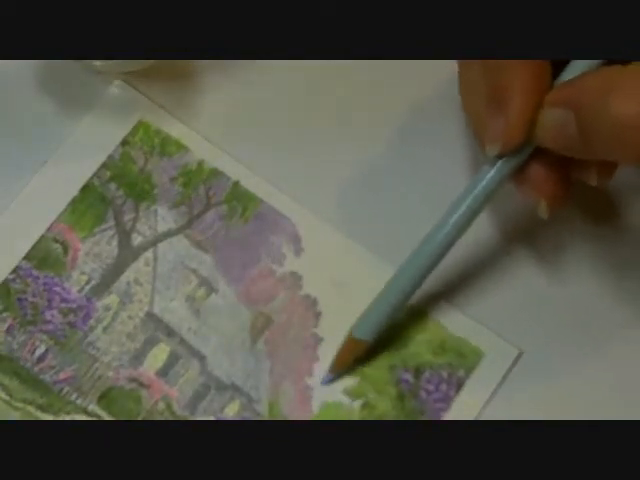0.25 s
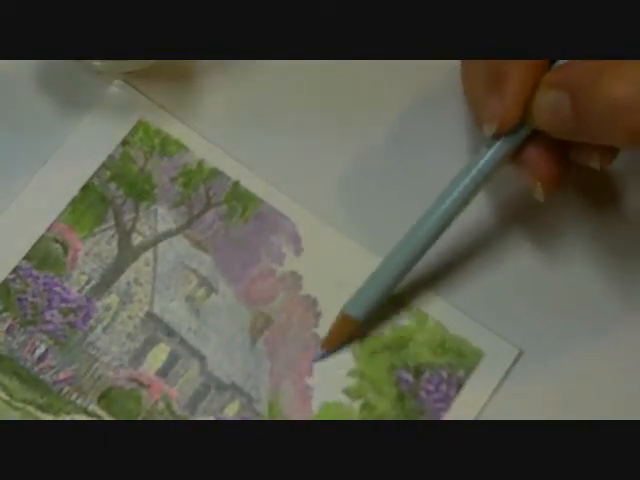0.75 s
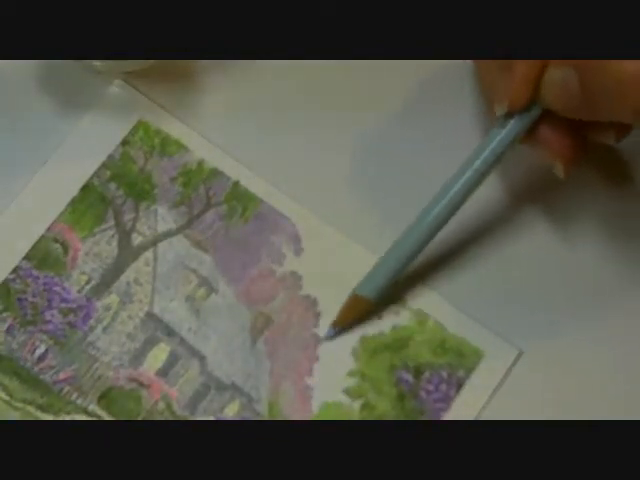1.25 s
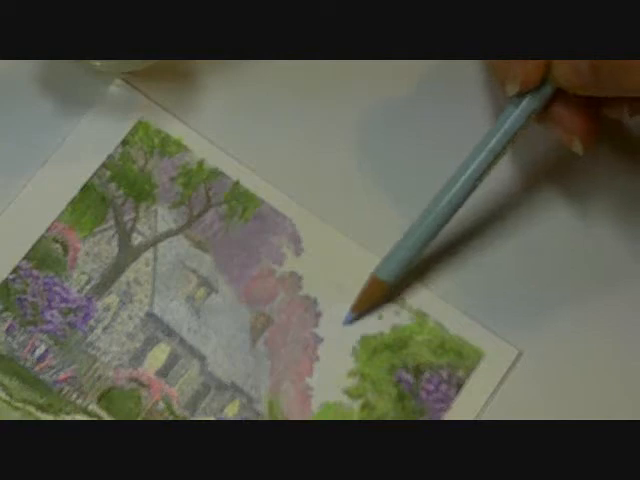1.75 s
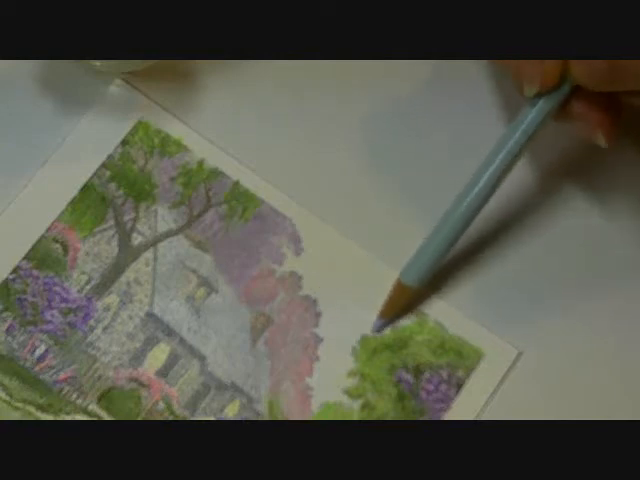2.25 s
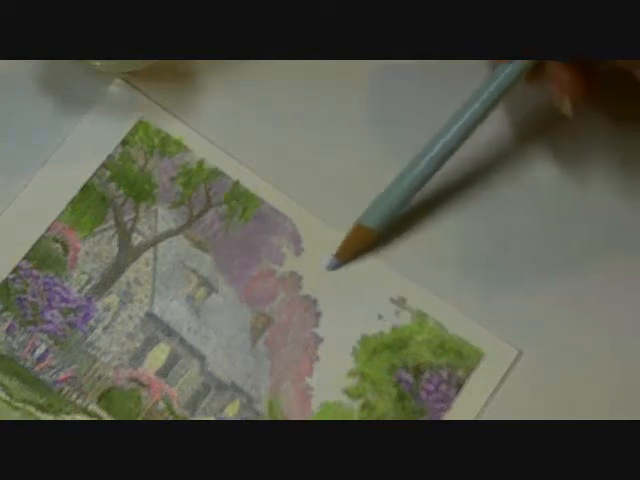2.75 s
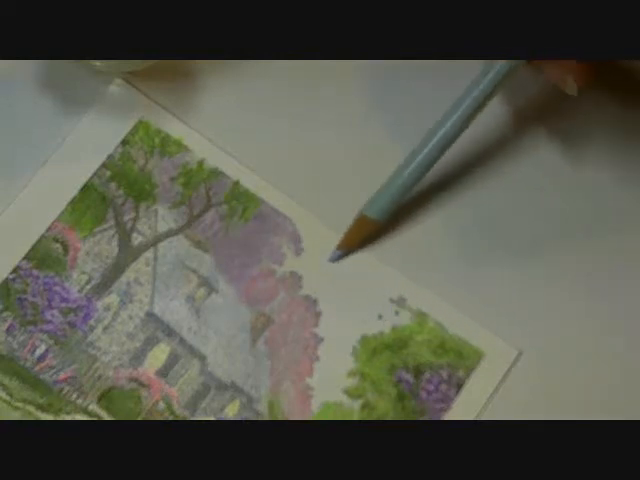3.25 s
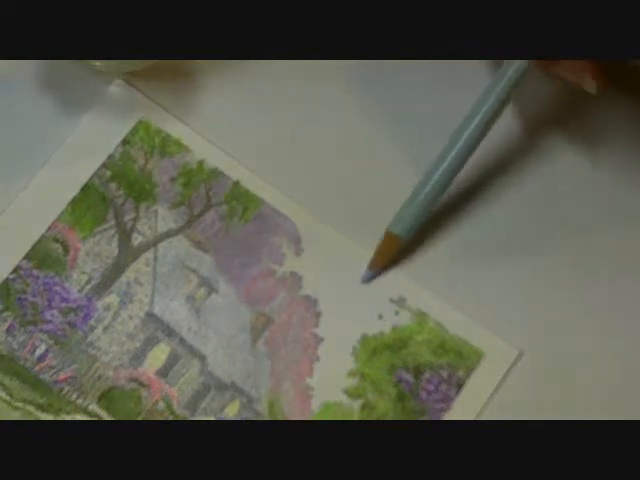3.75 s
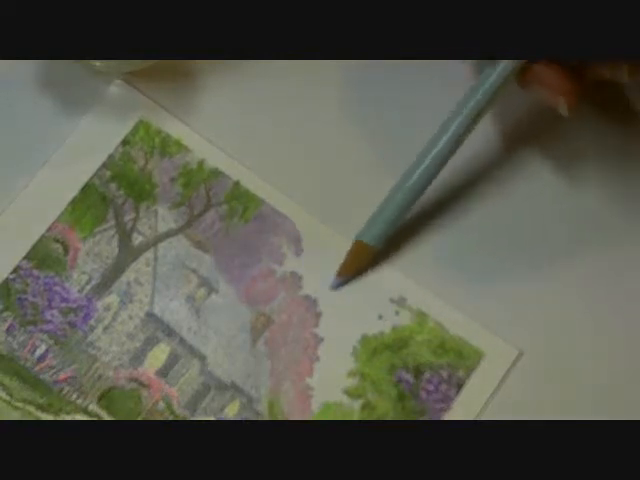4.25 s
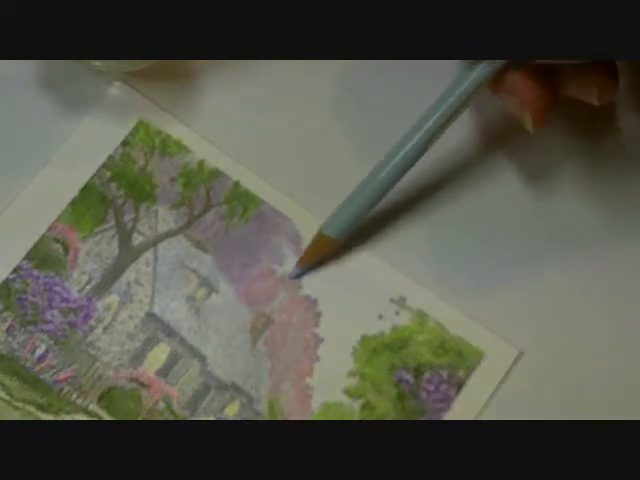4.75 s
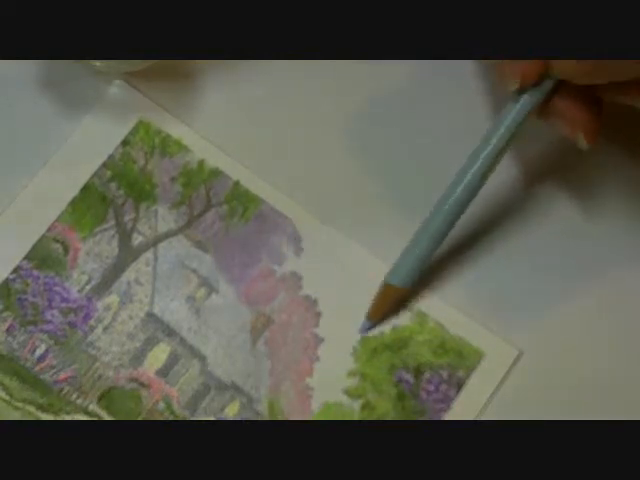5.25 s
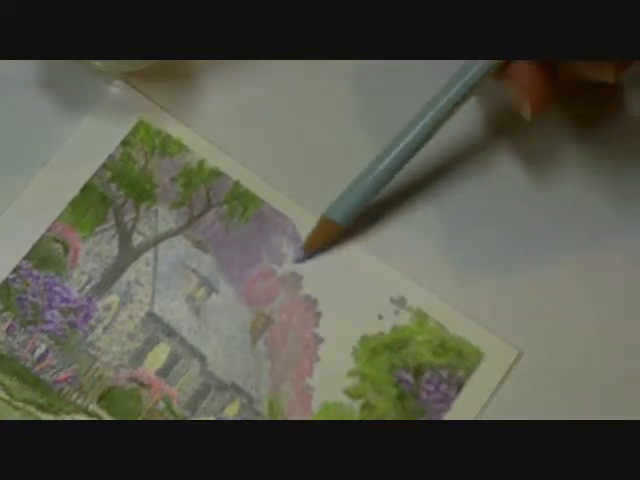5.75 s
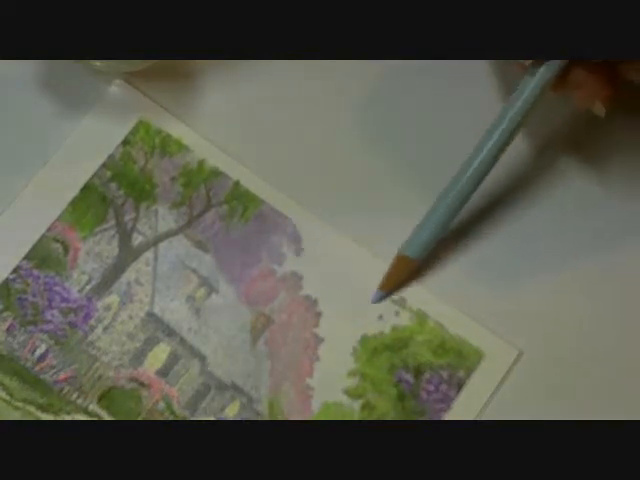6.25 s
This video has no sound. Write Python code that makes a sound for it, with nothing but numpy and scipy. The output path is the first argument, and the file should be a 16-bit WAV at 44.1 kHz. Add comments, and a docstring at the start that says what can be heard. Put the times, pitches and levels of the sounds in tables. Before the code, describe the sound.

Close to the microphone, a coloured pencil shades paper without pause, about eleven short strokes a second, out and back, crisp, grainy and high-pitched. Two small clicks come when the lead snags, near a third of the way and later on. A soft wooden knock follows the first snag, leaving a faint low note. Behind lies a steady quiet room rush and a clock ticking about once a second.

```python
"""At a desk in a room, a coloured pencil shades a sheet of paper close by, about eleven strokes a second.
The lead plucks paper fibres at random, and each pluck makes pencil and sheet ring; now and then it snags
with a small click. Behind it are a steady rush of shaped noise, a faint clock ticking about once a second
as ringing reflections, and one soft knock that rings wood and leaves a low note."""
import sys
import numpy as np
from scipy import signal
from scipy.fft import rfft, irfft
from scipy.io import wavfile

SR = 44100
rng = np.random.default_rng(int(sys.argv[2]) if len(sys.argv) > 2 else 0)


def transcribe(u):
    """Save the signal u as a 16-bit wav file named by the first command-line argument.

    u: samples, shape (n,) or (channels, n), limited to [-1, 1]; the rate is SR.
    q: integer samples, one column per channel.
    """
    v = np.clip(np.atleast_2d(u).T, -1, 1)
    q = np.round(v * 32767).astype(np.int16)
    wavfile.write(sys.argv[1], SR, q)


N = 286209
TIME = np.arange(N) / SR
# samples that hold the longest stroke and its ring
LONGEST = SR // 5


def from_db(db):
    """Turn decibels into a plain multiplier."""
    return 10 ** (np.asarray(db) / 20)


def unit_power(x):
    """Scale a sound to an average power of one."""
    return x / np.sqrt(np.mean(x ** 2) + 1e-20)


def drift(rate_hz):
    """Smooth random wandering, about rate_hz changes a second, with a spread of 1."""
    r = np.exp(-2 * np.pi * rate_hz / SR)
    noise = rng.standard_normal(N + SR)
    # the first second only lets the filter settle
    smooth = signal.lfilter([1], [1, -2 * r, r * r], noise)[SR:]
    return unit_power(smooth)


def resonate(x, hz, width_hz):
    """Ring at one pitch, with a gain of 1 at its peak; a narrower resonance rings longer."""
    r = np.exp(-np.pi * width_hz / SR)
    feed = (1 - r * r) / 2 * np.array([1, 0, -1])
    feedback = [1, -2 * r * np.cos(2 * np.pi * hz / SR), r * r]
    return signal.lfilter(feed, feedback, x + 1e-18)


def ring_body(x, modes):
    """Let an object ring at several pitches side by side, with alternating signs."""
    out = 0
    for k, (hz, width_hz, db) in enumerate(modes):
        out = out + (-1) ** k * from_db(db) * resonate(x, hz, width_hz)
    return out


def struck_ring(modes):
    """The ring of an object after one sharp tap, scaled to a peak of 1."""
    ring = ring_body(signal.unit_impulse(SR), modes)
    return ring / np.abs(ring).max()


def play_at(events, response):
    """Play one sound at every (t/s, level/dB)."""
    clicks = np.zeros(N)
    for t, db in events:
        clicks[round(t * SR)] += from_db(db)
    return signal.fftconvolve(clicks, response)[:N]


def reflections(t60_s, build_s):
    """Dense random reflections that build up, then fall 60 dB in t60_s; total energy is one."""
    t = TIME[:SR]
    fade = from_db(-60 * t / t60_s)
    tail = rng.standard_normal(SR) * fade * (1 - np.exp(-t / build_s))
    return tail / np.sqrt(np.sum(tail ** 2))


# colour of the room rush and microphone hiss: (f/Hz, relative level/dB per Hz)
ROOM_COLOUR = [(25, -34), (45, -18), (62, -12), (85, -11), (150, -3), (290, 0.5), (550, -2), (1000, -3.8),
               (1350, -7.5), (2000, -8.5), (3200, -11), (6500, -12.5), (15000, -12.5)]


def room_rush(level_db):
    """Steady air noise with a bed of hiss: random noise shaped by pitch."""
    hz, db = np.transpose(ROOM_COLOUR)
    noise_hz = np.maximum(np.fft.rfftfreq(N, 1 / SR), 1)
    gain = from_db(np.interp(np.log(noise_hz), np.log(hz), db))
    noise = irfft(rfft(rng.standard_normal(N)) * gain, N)
    return from_db(level_db) * unit_power(noise)


# pace of the hand, steady but for one hurried little swing: (t/s, back-and-forth swings completed)
SWINGS = [(0.002, 0), (0.373, 2), (1.941, 11), (2.124, 12), (2.515, 14), (2.884, 16), (3.059, 17),
          (3.25, 18), (3.978, 22), (4.497, 25), (4.813, 27), (4.946, 28), (5.122, 29), (5.699, 32),
          (6.484, 36)]
# how hard the lead is pressed, as the base level of its rasp: (t/s, level/dB)
PRESSURE = [(0.05, -47.5), (0.32, -45.5), (0.94, -47.5), (1.02, -46.0), (1.29, -48.5), (2.08, -45),
            (2.27, -46), (2.93, -44.5), (3.02, -47.0), (4.28, -44), (4.77, -46.1), (4.84, -50), (4.91, -51),
            (4.99, -46), (6.44, -44)]
# single strokes that dig in harder: (t/s, extra level/dB)
ACCENTS = [(1.55, 2), (2.66, 2), (3.38, 3), (3.84, 2), (4.62, 0.5), (5.17, 1)]
# manner of each direction: the outward stroke bites at once and fades, the return swells
# (wait after the turn/s, rest before the next/s, weight/dB, lean from start to end/dB,
#  softness of the bite as a power of speed, body below 9 kHz/dB,
#  top above 11 kHz at the first place/dB, the same at the second place/dB)
OUTWARD = (.009, .001, 0.05, -8.5, 0.54, 0.22, 1, -1)
RETURN = (.001, .009, 0.14, 1.5, 0.96, -.5, -1.5, 0)
# a swing of this length (s) splits evenly; the far turn comes later by this share of any extra length
EVEN_SWING_S, OUT_STRETCH = 0.173, 0.21


def strokes():
    """Each swing of the hand is a stroke out and a stroke back: (start s, end s, level dB, manner)."""
    times, done = np.transpose(SWINGS)
    turns = np.interp(np.arange(round(done[-1]) + 1), done, times)
    rows = []
    for start, end in zip(turns, turns[1:]):
        length = end - start
        far_turn = start + length / 2 + OUT_STRETCH * (length - EVEN_SWING_S)
        for t0, t1, (wait, rest, *manner) in [(start, far_turn, OUTWARD), (far_turn, end, RETURN)]:
            pressure_db = np.interp((t0 + t1) / 2, *np.transpose(PRESSURE))
            accent_db = sum(db for t, db in ACCENTS if t0 <= t < t1)
            rows.append((t0 + wait, t1 - rest, pressure_db + accent_db, manner))
    return rows


# level of the rasp's body below 9 kHz: (t/s, level/dB)
BODY_LEVEL = [(0, -3), (.45, -2), (.95, 0), (3.1, 1), (4.65, -1), (5, -1), (5.35, 1.6), (6.49, .5)]
# resonances of pencil and sheet, each passed through twice:
# (f/Hz, width of one pass/Hz, level at the first place/dB, level at the second place/dB)
PENCIL = [(4330, 640, -11.8, -14), (5030, 660, -26.5, -16.5), (5520, 350, -10.5, -19), (5875, 380, -14, -8),
          (6300, 380, -11, -23), (7040, 1270, -16, -12), (7550, 640, -3.5, -6), (8160, 460, -8.5, -10.5),
          (8830, 1400, -11, -14.5), (9580, 500, -6.5, -3), (9950, 480, -8, -0.5), (10336, 590, -2, 0.0),
          (10730, 660, -9, -4), (11530, 1240, -5, -7.5), (12250, 950, -4.5, -6.5), (12800, 230, -1.5, -8),
          (13180, 800, -2.5, -7), (14020, 2900, -15, -9), (15020, 350, -9, -13)]
# the tip works its way up the sheet: (t/s, place from 0 = first to 1 = second)
PLACE = [(0, 0.32), (1.3, 0.07), (2.3, 0.54), (3.3, 0.86), (6.49, 0.93)]
BODY_BELOW_HZ, TOP_ABOVE_HZ = 9000, 11000


def stroke(row, ridges, release, fibres_per_s, crawl, detune, vary_db):
    """The lead plucks more paper fibres the faster it moves; each pluck rings the resonances."""
    start, end, level_db, manner = row
    weight_db, lean_db, bite, body_db, first_top_db, second_top_db = manner
    along = np.linspace(0, 1, round((end - start) * SR))
    speed = np.abs(np.sin(np.pi * along))

    # one power of speed shapes the bite after the turn, another the easing off
    swell = speed ** np.where(along < 0.5, bite, release)
    loudness = from_db(level_db + weight_db + lean_db * (along - 0.5)) * swell
    chance = np.clip(fibres_per_s * (speed + crawl) / SR, 1e-4, 1)
    # rarer plucks are stronger, so their average power stays even
    plucks = (rng.random(len(along)) < chance) / np.sqrt(chance)
    force = np.pad(plucks * loudness, (0, LONGEST - len(along))) * ridges

    place = np.clip(np.interp(start, *np.transpose(PLACE)), 0, 1)
    body_db = body_db + np.interp(start, *np.transpose(BODY_LEVEL))
    top_db = first_top_db + place * (second_top_db - first_top_db)
    out, power = 0, 0
    for hz, width_hz, first_db, second_db in PENCIL:
        colour_db = body_db * (hz < BODY_BELOW_HZ) + top_db * (hz > TOP_ABOVE_HZ)
        place_db = first_db + place * (second_db - first_db)
        # every stroke lands a little differently, which shifts each resonance in strength and pitch
        gain = from_db(place_db + colour_db + vary_db * rng.standard_normal())
        pitch = hz * (1 + detune * rng.standard_normal())
        # two passes give each resonance steep sides, with dark valleys between
        ring = resonate(force * rng.choice([-1, 1], LONGEST), pitch, width_hz)
        out = out + gain * resonate(ring, pitch, width_hz)
        power = power + gain ** 2 * np.pi * width_hz / (2 * SR)
    return out / np.sqrt(power)


def shading(tooth_db, tooth_rate_hz, level_db):
    """All strokes in a row, over paper whose ridges make the contact force flutter."""
    ridges = unit_power(from_db(tooth_db * drift(tooth_rate_hz)))
    ridges = np.pad(ridges, (0, LONGEST), mode="edge")
    out = np.zeros(N + LONGEST)
    for row in strokes():
        at = max(round(row[0] * SR), 0)
        span = slice(at, at + LONGEST)
        out[span] += stroke(row, ridges[span], release=0.57, fibres_per_s=9500, crawl=0.15,
                            detune=0.0027, vary_db=1.5)
    return from_db(level_db) * out[:N]


def desk(x, near_db, near_t60_s, room_db, room_t60_s):
    """Quick reflections from the desk and things on it, then a weak room tail."""
    near = from_db(near_db) * reflections(near_t60_s, build_s=0.002)
    room = from_db(room_db) * reflections(room_t60_s, build_s=0.014)
    return x + signal.fftconvolve(x, near + room)[:N]


# clock ticks: (t/s, level/dB)
TICKS = [(.858, -59), (1.868, -62.5), (2.864, -59.5), (3.856, -61), (4.854, -61.5), (5.860, -59.5)]
# resonances of the clock case: (f/Hz, width/Hz, level/dB)
CLOCK_CASE = [(1070, 170, 0), (1920, 420, -4), (2724, 150, 3.5), (3520, 530, -4.5), (4700, 240, 0.5)]


def clock(t60_s):
    """Distant ticks arrive as reflections that ring the case, a little different each time."""
    out = np.zeros(N)
    for event in TICKS:
        tick = ring_body(reflections(t60_s, build_s=0.008), CLOCK_CASE)
        # the tick's level is set over its first twentieth of a second
        out += play_at([event], tick / tick[:SR // 20].std())
    return out


# moments when the lead catches and lets go: (t/s, level/dB)
SNAGS = [(2.0708, -28), (2.0728, -30), (4.0885, -34.5), (4.110, -37), (4.320, -51)]
# what a snag rings with: (f/Hz, width/Hz, level/dB)
SNAG_RING = [(2000, 600, -13), (4100, 410, -5), (5050, 900, 3.5), (6600, 910, 0), (10500, 2600, -3)]


def snags():
    """A sudden slip of the lead: one sharp, short ring."""
    return play_at(SNAGS, struck_ring(SNAG_RING))


# resonances of a soft knock on wood: (f/Hz, width/Hz, level/dB)
KNOCK_WOOD = [(240, 73, -1), (398, 84, -1.5), (550, 77, 2.5), (1126, 120, -1), (1550, 340, -2.5),
              (1950, 870, -12)]
# one low note of the knock rings on: (f/Hz, level/dB, time to fall 60 dB/s)
KNOCK_NOTE = (302, -61.5, 2.9)
KNOCK_S = 2.293


def knock(level_db, room_db, t60_s):
    """A dull bump on wood, its wash in the room and one low note that lingers."""
    direct = play_at([(KNOCK_S, level_db)], struck_ring(KNOCK_WOOD))
    wash = from_db(room_db) * signal.fftconvolve(direct, reflections(t60_s, build_s=0.02))[:N]
    hz, note_db, note_t60_s = KNOCK_NOTE
    note = np.sin(2 * np.pi * hz * TIME) * from_db(-60 * TIME / note_t60_s)
    return direct + wash + play_at([(KNOCK_S, note_db)], note)


def scene():
    """Add all the sounds together and send the same mix to left and right."""
    rush = room_rush(level_db=-56)
    rasp = shading(tooth_db=0.9, tooth_rate_hz=120, level_db=0.0)
    pencil = desk(rasp + snags(), near_db=-12.0, near_t60_s=0.035, room_db=-17, room_t60_s=0.4)
    mono = rush + pencil + clock(t60_s=0.34) + knock(level_db=-39.5, room_db=3.5, t60_s=1.0)
    return np.stack([mono, mono])


NOTCH_HZ, CUTOFF_HZ = 7850, 15350


def record(dry):
    """Remove one narrow band of pitch and cut the treble steeply."""
    notch = signal.iirnotch(NOTCH_HZ, 45, fs=SR)
    top_cut = signal.ellip(12, 0.1, 80, CUTOFF_HZ, fs=SR, output="sos")
    return signal.sosfilt(top_cut, signal.lfilter(*notch, dry))


dry = scene()
out = record(dry)
transcribe(out)
```